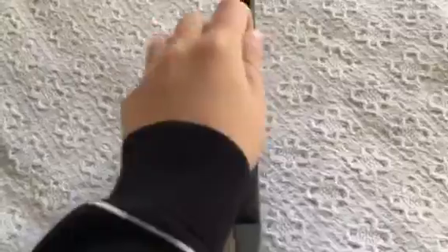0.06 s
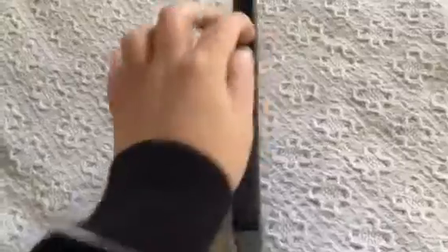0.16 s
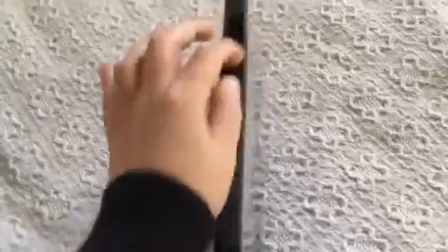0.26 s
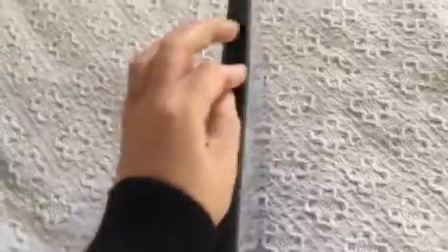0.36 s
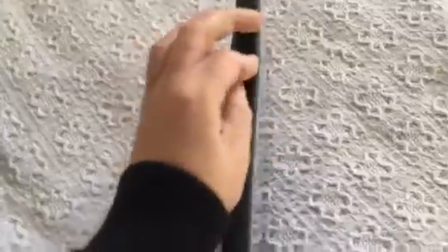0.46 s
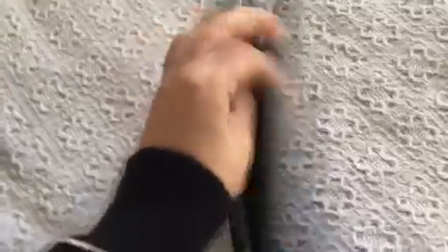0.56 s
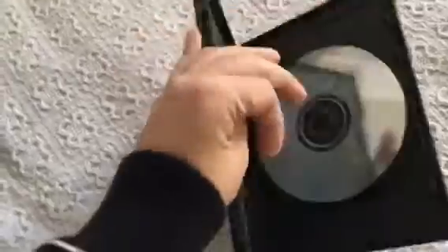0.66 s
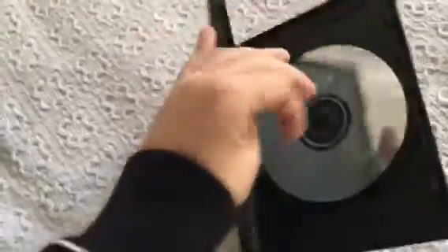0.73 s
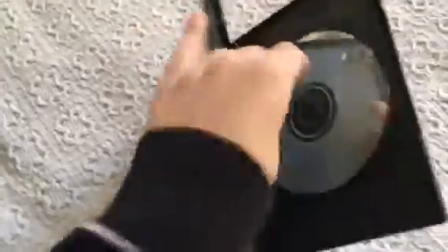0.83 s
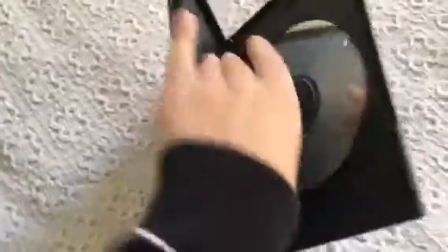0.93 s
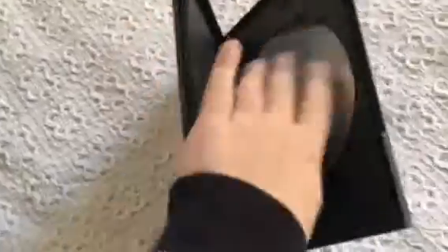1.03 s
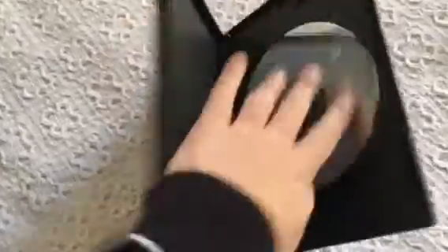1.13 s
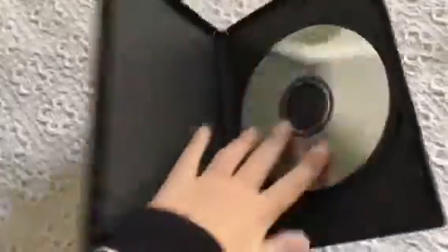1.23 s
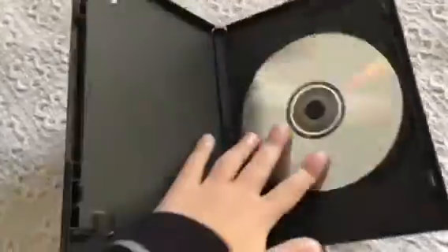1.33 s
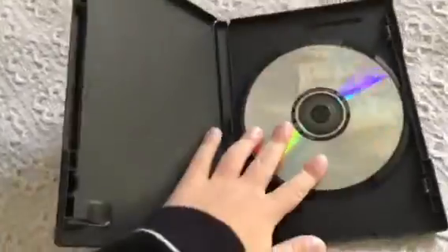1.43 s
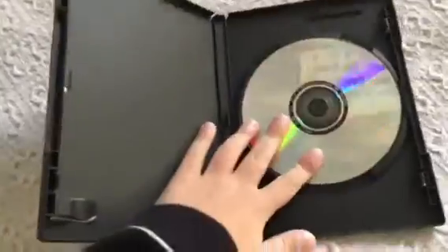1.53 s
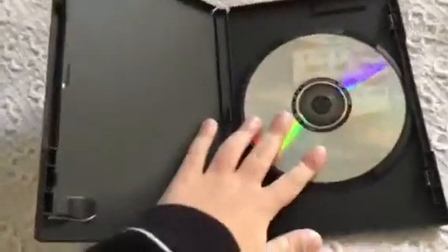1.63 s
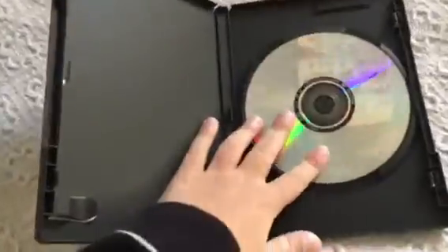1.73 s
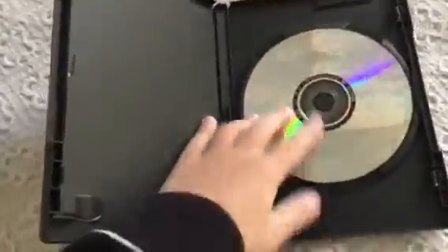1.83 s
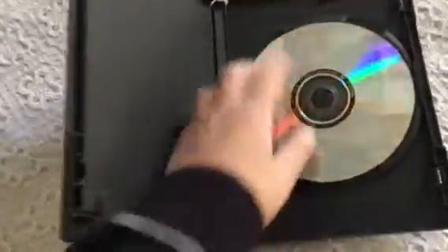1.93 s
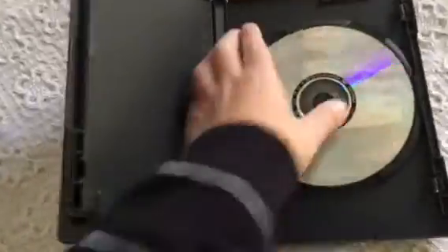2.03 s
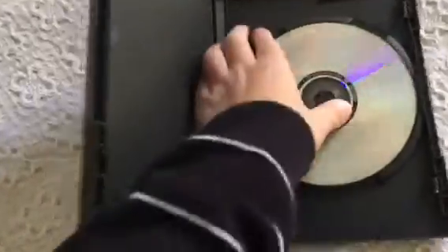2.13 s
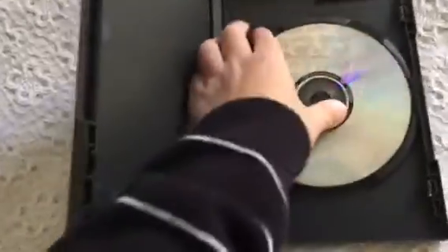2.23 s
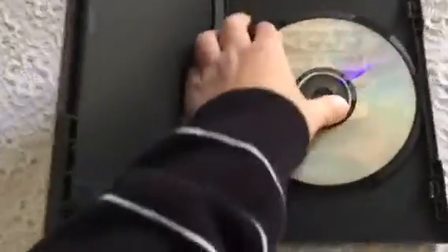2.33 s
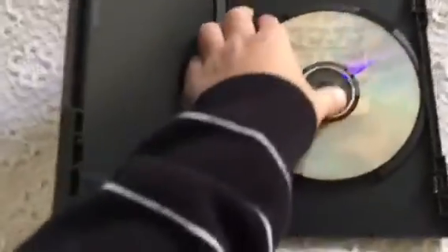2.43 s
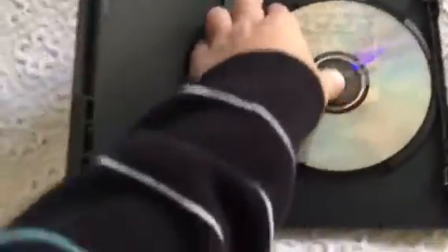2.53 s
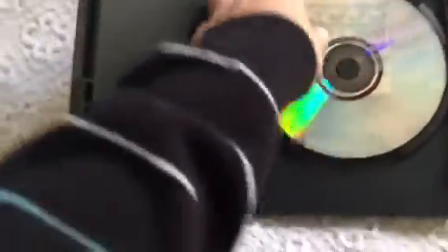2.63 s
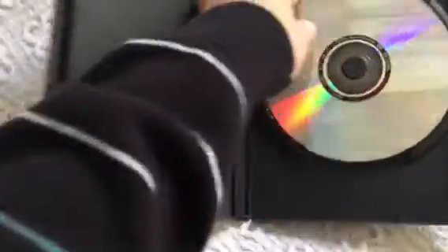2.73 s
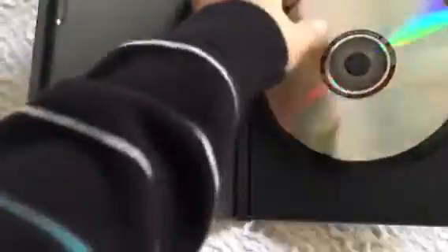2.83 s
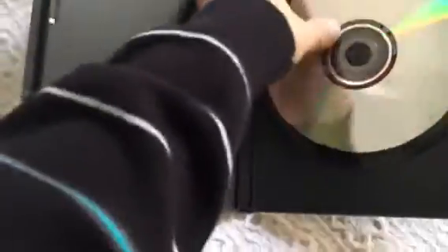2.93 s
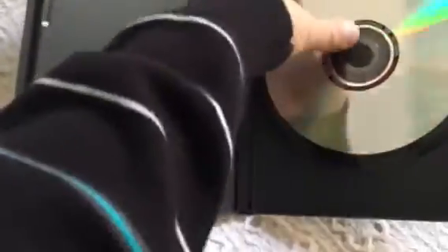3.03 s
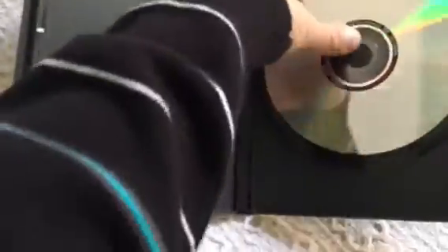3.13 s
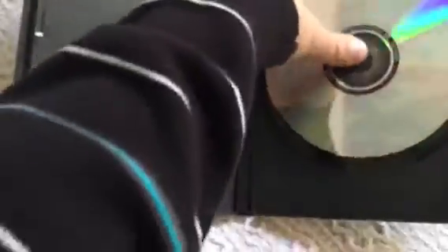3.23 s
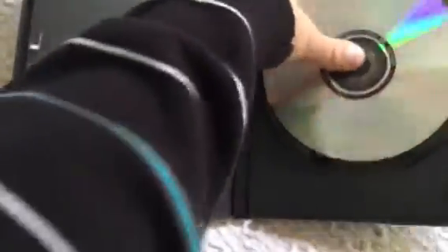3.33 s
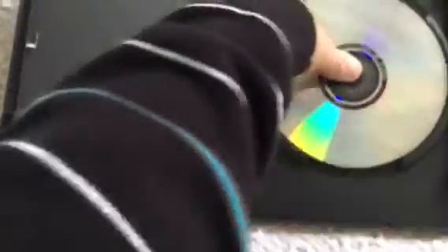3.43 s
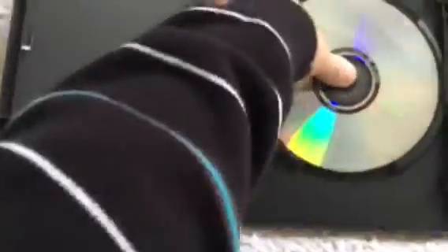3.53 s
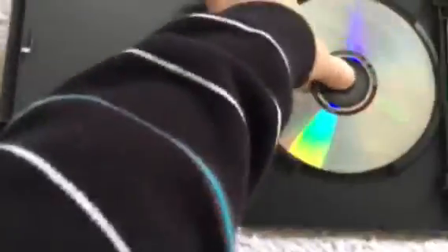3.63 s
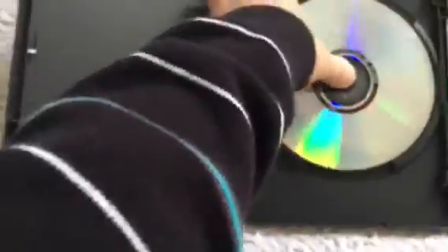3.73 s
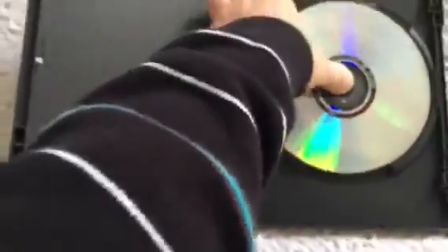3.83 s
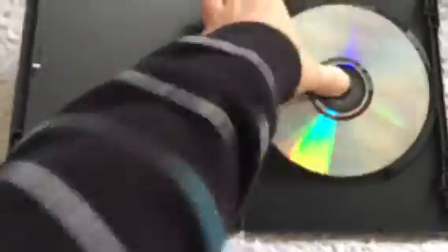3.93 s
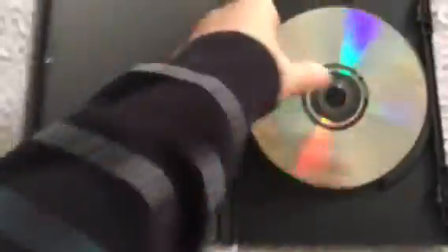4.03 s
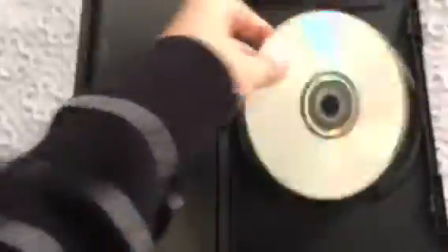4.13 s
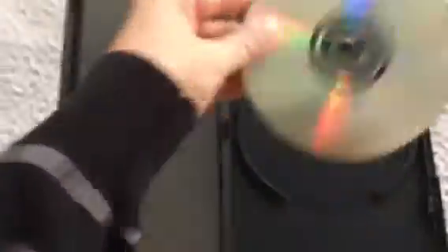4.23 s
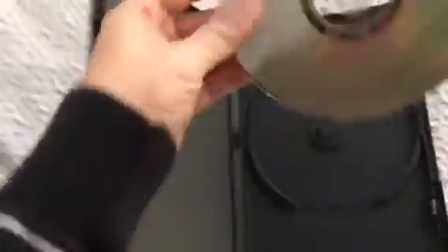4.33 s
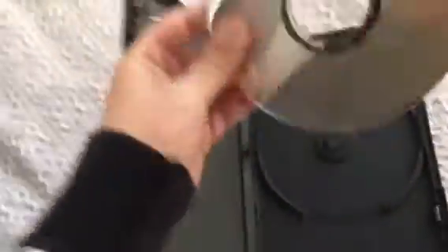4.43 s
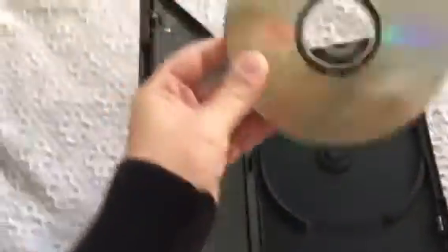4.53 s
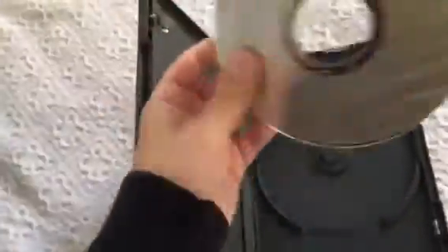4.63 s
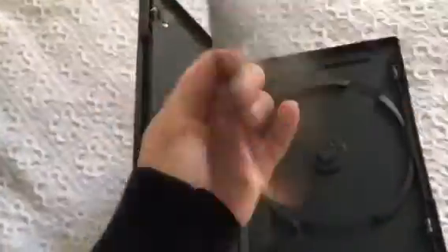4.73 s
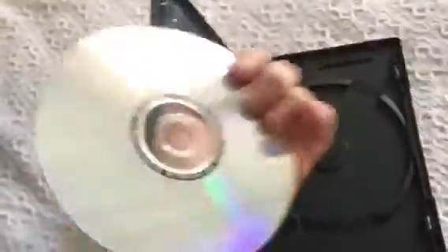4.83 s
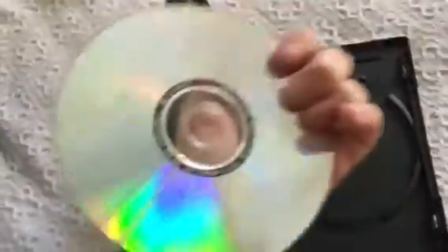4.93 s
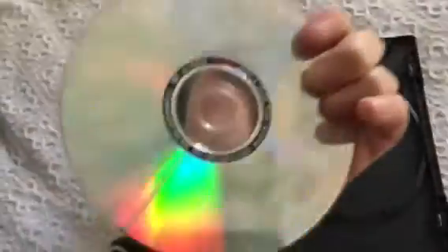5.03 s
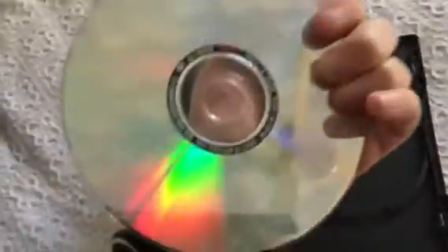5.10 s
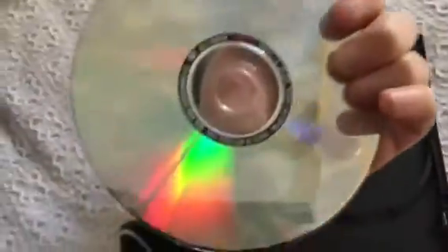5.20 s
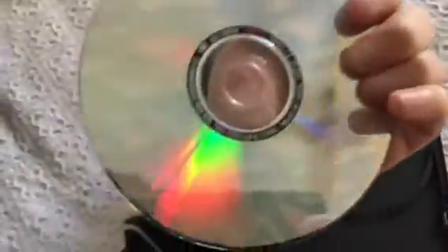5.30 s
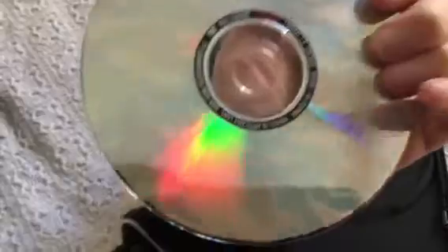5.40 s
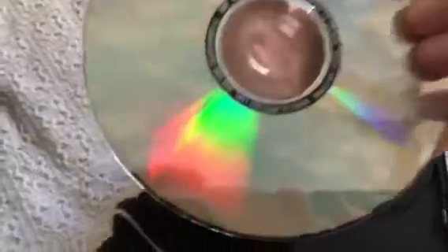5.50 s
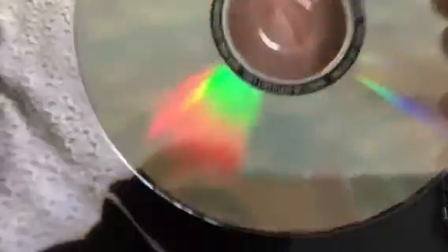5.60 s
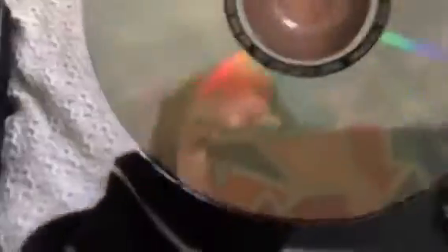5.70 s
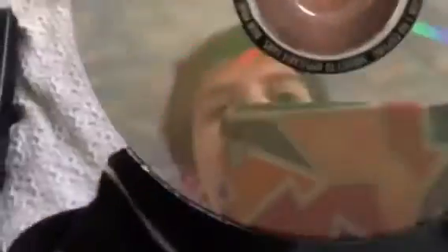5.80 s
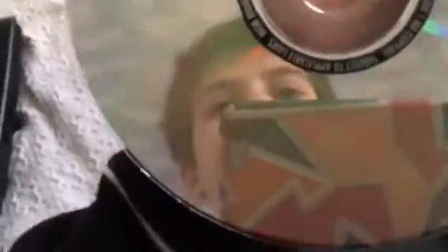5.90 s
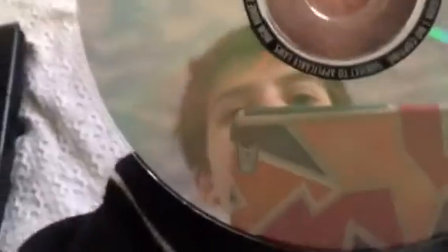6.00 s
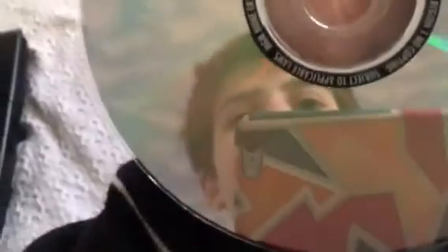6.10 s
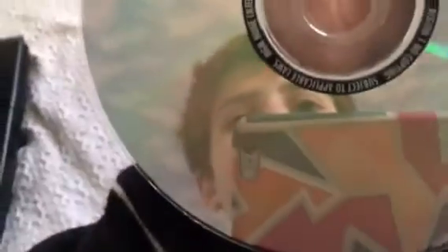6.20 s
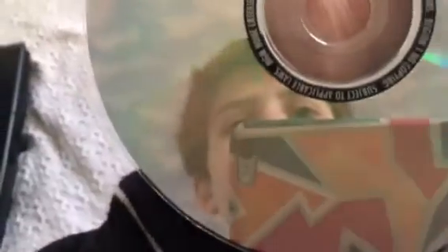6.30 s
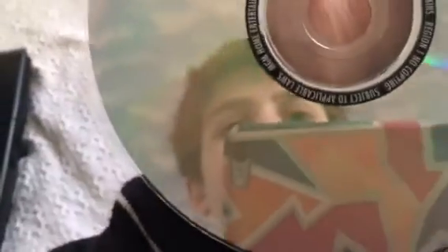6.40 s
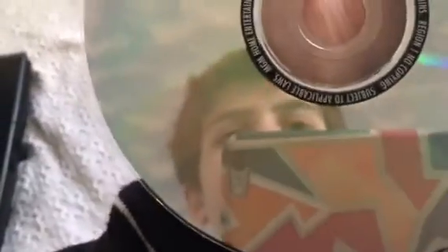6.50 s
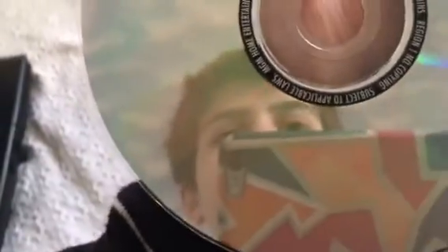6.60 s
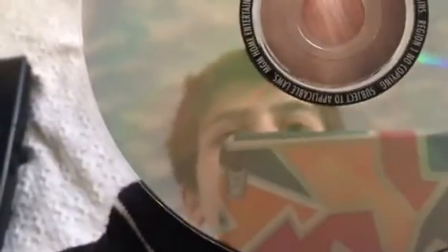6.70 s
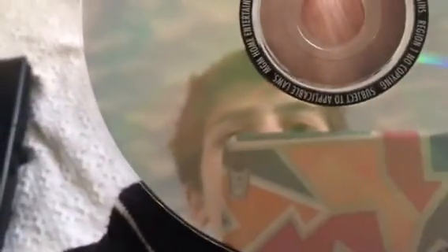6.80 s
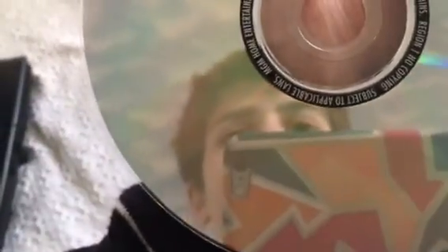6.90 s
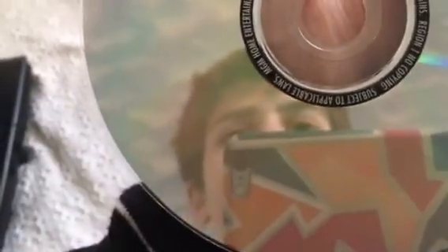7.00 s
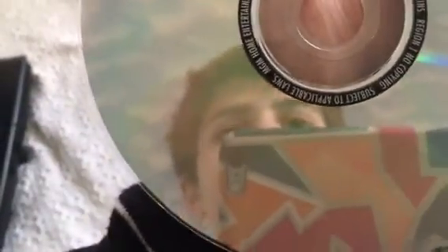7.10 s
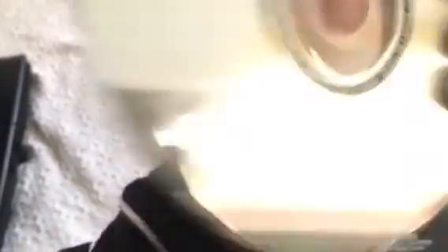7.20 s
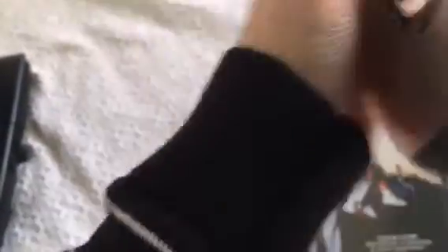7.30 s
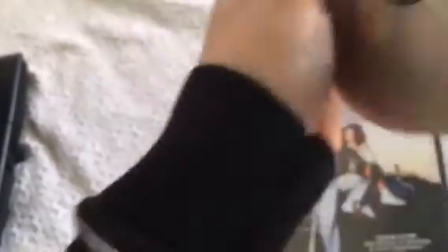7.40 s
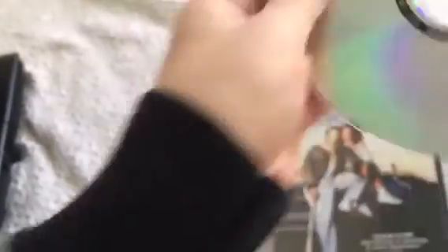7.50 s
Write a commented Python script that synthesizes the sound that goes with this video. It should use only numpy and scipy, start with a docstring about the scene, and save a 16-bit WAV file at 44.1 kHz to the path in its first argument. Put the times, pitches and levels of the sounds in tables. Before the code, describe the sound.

Close handling of a plastic disc case: faint scuffs, a hard catch snap, small hinge ticks, two sharp clicks freeing the disc, then near silence.

```python
"""In a small quiet room a plastic disc case lies on a cloth, close to the microphone.
Fingers pry at the lid until its catch snaps, fold it open and press the hub, which clicks and frees the disc.
The disc knocks on the tray, fingers scuff along its rim, and sleeve and case rub on the cloth.
Blows are decaying modes plus bursts of dense-mode noise; rubbing is stick-slip noise shaped by resonances.
Filtered noise makes the room's air and drone, and a short noise tail makes its reverberation."""
import sys
import numpy as np
from scipy import signal
from scipy.fft import rfft, irfft
from scipy.io import wavfile

SR = 44100
rng = np.random.default_rng(int(sys.argv[2]) if len(sys.argv) > 2 else 0)


def output_pcm(signal):
    """Save a mono or channel-first signal as 16-bit PCM at the path in sys.argv[1].

    Samples are clipped to [-1, 1] before scaling.
    """
    pcm = np.clip(np.atleast_2d(signal).T, -1, 1) * 32767
    wavfile.write(sys.argv[1], SR, np.round(pcm).astype(np.int16))


N = 332955
TIME = np.arange(N) / SR   # s
RING_TIME = TIME[:SR // 3]
CRACK_TIME = TIME[:SR // 20]


def from_db(db):
    """Level law: decibels to amplitude gain."""
    return 10 ** (np.asarray(db) / 20)


def rms_one(x):
    """Normalisation: scale to unit rms."""
    return x / np.sqrt(np.mean(x ** 2) + 1e-20)


def at_hz(points, hz):
    """Interpolation on a log-frequency axis: read a table of (Hz, value)."""
    f, value = np.transpose(points)
    return np.interp(np.log(hz), np.log(f), value)


def band(x, hz, kind, order=2):
    """Linear filtering: a causal Butterworth filter."""
    return signal.sosfilt(signal.butter(order, hz, kind, fs=SR, output="sos"), x + 1e-18)


def coloured(x, colour):
    """Spectral shaping: weight a steady excitation by frequency; rms 1."""
    hz = np.maximum(np.arange(N // 2 + 1) * SR / N, 1)
    return rms_one(irfft(rfft(x) * from_db(at_hz(colour, hz)), N))


def add(out, s, sound):
    """Superposition: mix a sound in at time s."""
    start = int(np.clip(round(s * SR), 0, N - 1))
    out[start:start + len(sound)] += sound[:N - start]


# third-octave filter bank
EDGES = np.geomspace(22, 17500, 30)   # Hz
CENTRES = np.sqrt(EDGES[1:] * EDGES[:-1])   # Hz
BANK = [signal.butter(2, EDGES[k:k + 2], "band", fs=SR, output="sos") for k in range(len(CENTRES))]


def dying_noise(time, colour, t60s, build_s):
    """High modal density: each third-octave band swells, then decays at its own rate; unit energy."""
    white = rng.standard_normal((2, len(time)))
    bands = np.array([signal.sosfilt(sos, white[k % 2]) for k, sos in enumerate(BANK)])
    decay = np.exp(-np.log(1000) * time / t60s[:, None])
    bands = bands * decay * (1 - np.exp(-time / build_s))
    gains = np.sqrt(CENTRES / np.sum(bands ** 2, axis=1)) * from_db(at_hz(colour, CENTRES))
    out = gains @ bands
    return out / np.sqrt(np.sum(out ** 2))


def friction(grains_per_s, spread_db, smooth):
    """Stick-slip: tiny slips of uneven size over a smooth hiss."""
    sizes = from_db(spread_db * np.minimum(rng.exponential(1, N), 4)) * rng.choice([-1, 1], N)
    slips = sizes * (rng.random(N) < grains_per_s / SR)
    return rms_one(slips) + smooth * rng.standard_normal(N)


def unevenness(per_s, spread_db):
    """Irregular friction: a sliding hand catches and lets go, a wandering gain."""
    knots = np.arange(0, TIME[-1] + 1, 1 / per_s)
    return from_db(spread_db * np.interp(TIME, knots, rng.standard_normal(len(knots))))


def strokes(grit, rows):
    """Amplitude modulation: brief gritty slides swell and fade along a Gaussian."""
    low = band(grit, 2300, "low")
    top = -band(grit, 4100, "high")   # sign aligns the phase of the two bands
    out = np.zeros(N)
    for s, half, db, treble_db in rows:
        near = abs(TIME - s) < 4 * half
        swell = np.exp(-((TIME[near] - s) / half) ** 2 / 2)
        out[near] += from_db(db) * swell * (low[near] + from_db(treble_db) * top[near])
    return out


def struck(blows, modes, crack, crack_db, crack_t60, bass_hz=750, treble_hz=3000):
    """Impact excitation: each blow rings the modes and a fresh crack; bass and treble levels vary by blow."""
    ring = sum((-1) ** k * from_db(db - 60 * RING_TIME / t60) * np.sin(2 * np.pi * hz * RING_TIME)
               for k, (hz, db, t60) in enumerate(modes))
    t60s = crack_t60 * (CENTRES / 2000) ** -.35   # plastic damps the treble first
    low, middle, top = np.zeros((3, N))
    for s, db, bass_db, treble_db in blows:
        hit = ring.copy()
        add(hit, 0, from_db(crack_db) * dying_noise(CRACK_TIME, crack, t60s, build_s=.0001))
        add(low, s, from_db(db + bass_db) * hit)
        add(middle, s, from_db(db) * hit)
        add(top, s, from_db(db + treble_db) * hit)
    # minus signs align the phase of the bands at each crossover
    upper = band(middle, treble_hz, "low") - band(top, treble_hz, "high")
    return band(low, bass_hz, "low") - band(upper, bass_hz, "high")


# spectrum of the quiet room's air: frequency_hz, relative_density_db (dB per Hz)
AIR_SPECTRUM = [(22, -24), (42, -6), (60, -1.5), (90, -14), (200, -17.5), (330, -25.5), (560, -29),
                (1100, -36.5), (3500, -43.5), (16000, -50.5)]
# low drone of the house: centre_hz, width_hz, level_db
DRONE_BANDS = [(56, 12, -68.5), (113, 18, -72.5)]
AIR_LEVEL_DB = -62


def air():
    """Narrow-band noise beats with itself: steady room noise under a low wavering drone."""
    drone = np.zeros(N)
    for hz, width, db in DRONE_BANDS:
        hum = band(rng.standard_normal(N + SR), [hz - width / 2, hz + width / 2], "band")
        drone += from_db(db) * rms_one(hum[SR:])   # skip the filter's build-up
    return from_db(AIR_LEVEL_DB) * coloured(rng.standard_normal(N), AIR_SPECTRUM) + drone


# strokes of hand and sleeve over case and cloth: start_s, length_s, drag_db, fibre_hiss_db, hollow_pitch_hz
CLOTH_STROKES = [(0.0, 0.61, -71.5, -75, 800), (0.22, 0.09, -63, -76, 815), (0.85, 0.2, -65, -65, 1250),
                 (0.98, 0.105, -60, -68, 1620), (1.003, 0.24, -67, -65.5, 1190),
                 (1.181, 0.23, -62, -60, 1070), (1.293, 0.3, -70.5, -61.5, 1290),
                 (1.494, 0.22, -74, -74.5, 1260), (1.992, 0.31, -63.5, -65, 1240),
                 (2.203, 0.52, -75.5, -79.5, 1200), (2.643, 0.27, -69, -71.5, 1300),
                 (2.832, 0.44, -70.5, -92, 680), (3.065, 0.16, -71, -86, 1240),
                 (3.24, 0.18, -65, -77, 1400), (3.406, 0.28, -66, -74, 1550), (3.5, 0.88, -70, -67.5, 1102),
                 (4.166, 0.16, -68, -77.5, 1080), (4.206, 0.51, -74, -79, 644),
                 (5.5, 0.73, -75.5, -79.5, 1420)]
# spectrum of the dull drag: frequency_hz, relative_density_db (dB per Hz)
DRAG_SPECTRUM = [(200, -20), (550, -3), (900, -2.5), (1600, 1.5), (2400, -7), (4000, -16.5), (8000, -33)]
# spectrum of the hissing fibres: frequency_hz, relative_density_db (dB per Hz)
FIBRE_SPECTRUM = [(1200, -25.5), (2500, -1), (4000, -0.5), (6300, -3), (8000, -5.5), (9500, -3.5),
                  (10500, -10), (15000, -9.5)]
HOLLOW_RISE_OCTAVES, HOLLOW_WIDTH_OCTAVES, HOLLOW_GAIN = .3, 0.8, .7
SLEEVE_REST_DB = -85.5   # the sleeve is never quite still
SPEED_UP_SHARE, SLOW_DOWN_SHARE = .35, .3   # of each stroke's length


def cloth():
    """Sliding friction: a stroke's speed sets the level of drag and hiss and lifts a hollow resonance."""
    rub, *grit = [friction(grains_per_s=540, spread_db=3.5, smooth=.8) for _ in range(3)]
    rub = coloured(rub, DRAG_SPECTRUM)
    fibres = coloured(friction(grains_per_s=1500, spread_db=3.0, smooth=1.1), FIBRE_SPECTRUM)
    fibres = fibres * unevenness(per_s=40, spread_db=1.8)
    catching = unevenness(per_s=45, spread_db=3.4)
    pitches = CENTRES[(CENTRES > 400) & (CENTRES < 2800)]
    hollows = np.array([rms_one(band(grit[k % 2], [hz / 1.12, hz * 1.12], "band"))
                        for k, hz in enumerate(pitches)])
    hollows = hollows * [unevenness(per_s=29, spread_db=3.5) for _ in pitches]
    out = from_db(SLEEVE_REST_DB) * fibres
    for start, length, drag_db, hiss_db, hollow_hz in CLOTH_STROKES:
        during = (TIME >= start) & (TIME < start + length)
        progress = (TIME[during] - start) / length
        speed = np.clip(np.minimum(progress / SPEED_UP_SHARE, (1 - progress) / SLOW_DOWN_SHARE), 0, 1)
        # the resonance reaches its listed pitch at full speed
        octaves_off = np.log2(pitches / hollow_hz)[:, None] + HOLLOW_RISE_OCTAVES * (1 - speed)
        weights = np.exp(-(octaves_off / HOLLOW_WIDTH_OCTAVES) ** 2)
        hollow = np.sum(hollows[:, during] * weights, axis=0)
        drag = rms_one(rub[during] + HOLLOW_GAIN * hollow) * catching[during]
        out[during] += speed * (from_db(drag_db) * drag + from_db(hiss_db) * fibres[during])
    return out


# short slides of the shell on the cloth: centre_s, half_length_s, level_db, treble_db (relative)
CASE_SCUFFS = [(0.018, 0.011, -52.5, -15), (0.293, 0.0014, -48, -3.5), (0.669, 0.004, -62, -10),
               (1.129, 0.011, -63, 4.5), (1.25, 0.02, -48.5, -10), (1.271, 0.0097, -46.5, 3.5),
               (1.321, 0.0087, -48, -1.5), (2.832, 0.014, -56.5, -24), (3.343, 0.016, -63, 2.5)]
# spectrum of the rasp: frequency_hz, relative_density_db (dB per Hz)
SCUFF_SPECTRUM = [(180, -40), (300, -1), (447, -9), (511, -31.5), (603, -5.5), (1300, -8.5), (1690, -9.5),
                  (3030, -9), (5610, -13.5), (6520, -7), (16000, -27)]


def case_scuffs():
    """Broadband friction: the shell scuffs the cloth with a broad rasp."""
    rasp = coloured(friction(grains_per_s=580, spread_db=3.5, smooth=1.0), SCUFF_SPECTRUM)
    return strokes(rasp, CASE_SCUFFS)


HINGE_START_S, HINGE_LENGTH_S, HINGE_TICKS_PER_S = .8, .5, 30
HINGE_START_DB, HINGE_FADE_DB_PER_S, HINGE_SPREAD_DB = -46, 18, 3.0


def hinge(bass_db, treble_db):
    """Intermittent slip: the bending spine ticks unevenly, weaker as it relaxes; returns rows of blows."""
    draws = rng.standard_normal((40, 2))
    times = np.cumsum(np.exp(.5 * draws[:, 0]) / HINGE_TICKS_PER_S)
    levels = HINGE_START_DB - HINGE_FADE_DB_PER_S * times + HINGE_SPREAD_DB * draws[:, 1]
    return [(HINGE_START_S + t, db, bass_db, treble_db)
            for t, db in zip(times, levels) if t < HINGE_LENGTH_S]


# prying, the catch snapping open, the hinge ticking, the lid landing:
# start_s, level_db, bass_db, treble_db (both relative to the level)
CASE_IMPACTS = [(0.0688, -29.5, -6, -4.5), (0.4570, -39, -18, 5), (0.4762, -40.5, -15, 3),
                (0.5218, -30.5, 2.5, 9), (0.6841, -4, -4, -3.5), (0.6870, -3, -1, -3),
                (0.6922, -23.5, -28.5, 17), (0.6936, -6, -28.5, -13), (0.7478, -19, -36, -7),
                (0.7540, -33, -10, 2), (0.8580, -38, -26, 3), (1.5470, -36, -30, -1)]
# ringing modes of the shell: frequency_hz, level_db, t60_s
CASE_RINGING = [(112.1, -17, 0.12), (210.5, -19, 0.07), (315, -16.5, 0.051), (613, -12, 0.022),
                (762, -14.5, .016), (1080, -37, 0.14), (1440, -24.5, 0.011), (1700, -26.5, 0.016),
                (1955, -21.5, 0.02), (2322, -41, 0.1), (3201, -21.5, 0.015), (4150, -21.5, 0.015),
                (5700, -27.5, 0.016)]
# crack of the shell's close, damped plate modes: frequency_hz, relative_density_db (dB per Hz)
CASE_CRACK_SPECTRUM = [(150, -0.5), (350, -2), (490, -7), (650, 0), (800, 0), (1050, -4), (1500, 0.5),
                       (2500, -5.5), (4200, -6), (7000, -5), (10000, -11), (15000, -21)]


def case_shell():
    """Plate vibration: blows and hinge ticks excite the modes of the plastic shell."""
    blows = CASE_IMPACTS + hinge(bass_db=-18, treble_db=-1)
    return struck(blows, CASE_RINGING, CASE_CRACK_SPECTRUM, crack_db=4.0, crack_t60=0.02)


# soft fingertip taps and presses, each on a spot with its own pitch: start_s, level_db, pitch_hz
FINGER_TAPS = [(0.997, -50.5, 483), (1.881, -53, 266), (2.141, -53, 280), (2.271, -56, 284),
               (2.765, -49.5, 287), (2.921, -38.5, 1610), (2.9256, -41, 1074), (3.679, -50, 197.3),
               (4.0546, -42, 247), (4.0815, -46, 1820), (4.1380, -29, 1170), (4.1400, -31, 720),
               (4.1855, -39, 820)]
TAP_ATTACK_S = 0.00049   # the finger pad softens the contact
TAP_CYCLES = 17   # cycles to decay by 60 dB


def taps():
    """Damped flexure: a padded blow bends the panel for a few cycles, with a faint rasp of skin."""
    out = np.zeros(N)
    attack = 1 - np.exp(-RING_TIME / TAP_ATTACK_S)
    for s, db, hz in FINGER_TAPS:
        rasp = rms_one(band(rng.standard_normal(len(RING_TIME)), [hz / 2, hz * 2], "band"))
        decay = from_db(db - 60 * RING_TIME * hz / TAP_CYCLES)
        add(out, s, decay * attack * (np.sin(2 * np.pi * hz * RING_TIME) + .4 * rasp))
    return out


# fingers skidding on the rim of the disc: centre_s, half_length_s, level_db, treble_db (relative)
RIM_SKIDS = [(1.928, 0.048, -66.5, -9), (4.829, 0.015, -61.5, 3.5), (4.9, 0.02, -62.5, 4.5),
             (4.921, 0.0038, -52.5, 2), (7.315, 0.002, -64, 0), (7.32, 0.0018, -51.5, 0.5),
             (7.346, 0.028, -52.5, -2), (7.354, 0.0023, -44.5, 3), (7.499, 0.024, -62, 0.5),
             (7.544, 0.0031, -36, -3)]
# resonances of the held disc: frequency_hz, width_hz, relative_level_db
HELD_DISC_RESONANCES = [(238.9, 100, -1.5), (452.6, 330, -3), (977, 130, 3.5), (2050, 350, -3.5),
                        (2580, 500, -3), (3170, 340, -1), (3650, 510, -1), (4370, 250, 2.5),
                        (5200, 390, -0.5), (6200, 1340, -3.5), (9230, 580, -8), (12000, 5200, -17)]


def rim_skids():
    """Friction-driven resonance: skin slipping on the disc sets its resonances going."""
    slips = friction(grains_per_s=2300, spread_db=5.0, smooth=1.0)
    rim = sum((-1) ** k * from_db(db) * signal.lfilter(*signal.iirpeak(hz, hz / width, fs=SR), slips)
              for k, (hz, width, db) in enumerate(HELD_DISC_RESONANCES))
    return strokes(rms_one(rim), RIM_SKIDS)


# the springy hub under the thumb: start_s, level_db, bass_db, treble_db (both relative to the level)
HUB_IMPACTS = [(2.8320, -34, 2, -27), (3.1653, -42, -4, -17), (3.5341, -8.5, 7.5, 3.5),
               (3.5475, -28, 1.5, 2.5), (3.5571, -13, -0.5, -15), (3.6218, -25, 6.5, -5.5)]
# ringing modes of the hub: frequency_hz, level_db, t60_s
HUB_RINGING = [(522, -26.5, 0.028), (1235, -22, 0.02), (1562, -12.5, 0.013), (2000, -17.5, 0.022),
               (3087, -14, 0.012), (3150, -37, 0.26), (5700, -9.5, 0.01), (6765, -19, .008)]
# crack of the hub's close, damped modes: frequency_hz, relative_density_db (dB per Hz)
HUB_CRACK_SPECTRUM = [(150, -9), (500, -8.5), (950, -8), (1500, 3), (2300, -10.5), (3200, 0.5),
                      (4400, -10.5), (5800, -3), (9000, -8.5), (15000, -12)]


def hub():
    """Snap release: clicks of the springy hub excite its short, damped modes."""
    return struck(HUB_IMPACTS, HUB_RINGING, HUB_CRACK_SPECTRUM, crack_db=6.0, crack_t60=0.016)


# the disc springing free, touching the tray and shifting in the fingers:
# start_s, level_db, bass_db, treble_db (both relative to the level)
DISC_IMPACTS = [(3.8554, 0, 0.5, -3), (3.8583, -12.5, 2, 6.5), (3.8690, -24, -4, 6),
                (4.0528, -34.5, 7, -23), (4.1300, -48.5, 24.5, 12), (4.1378, -39, 20, -12),
                (4.2633, -33, 5, -2), (4.7771, -54, -11.5, 6), (4.9125, -44, 18.5, -2),
                (5.5329, -57, -4.5, 12.5), (7.2190, -57.5, -10, 1), (7.3518, -45, 6, -2),
                (7.5040, -49, 7, -1), (7.5200, -49.5, -12, 8)]
# ringing modes of the disc: frequency_hz, level_db, t60_s
DISC_RINGING = [(117, -30, .12), (227, -29, .05), (385.1, -23, 0.021), (632.2, -30.5, 0.013),
                (1130, -25, 0.027), (1440, -12.5, 0.01), (1850, -13, 0.016), (2316, -24.5, .05),
                (3010, -34.5, .06), (3380, -36, .06), (4730, -39.5, .08), (5627, -20.5, .03),
                (6290, -26.5, 0.029), (7000, -22.5, 0.013), (7150, -17.5, 0.013), (7900, -22, 0.012)]
# crack of the disc's close, damped plate modes: frequency_hz, relative_density_db (dB per Hz)
DISC_CRACK_SPECTRUM = [(150, -4), (450, -9), (950, -13), (1350, 1), (2200, 1), (3000, -4.5), (4300, -13),
                       (5800, -2.5), (7200, -.5), (9300, -13.5), (11500, -9), (15000, -11.5)]


def disc():
    """Plate vibration: knocks excite the many modes of the thin disc."""
    return struck(DISC_IMPACTS, DISC_RINGING, DISC_CRACK_SPECTRUM, crack_db=7, crack_t60=0.022)


# slowly dying modes of the disc off the tray: frequency_hz, level_db, t60_s
FREE_DISC_RINGING = [(528, -68, 1.7), (1070, -67, 1.0)]
LIFT_S = 4.264


def free_disc():
    """Light damping: held only by its rim, the disc hums faintly after its last touch on the tray."""
    out = np.zeros(N)
    hum = sum(from_db(db - 60 * TIME / t60) * np.sin(2 * np.pi * hz * TIME)
              for hz, db, t60 in FREE_DISC_RINGING)
    add(out, LIFT_S, hum)
    return out


# reverberation time of the room: frequency_hz, t60_s
ROOM_DECAY = [(100, 0.15), (500, 0.19), (2000, 0.18), (6000, 0.23), (15000, .22)]
# spectrum of the reflections: frequency_hz, relative_level_db
ROOM_SPECTRUM = [(100, 0), (400, -1.5), (1000, -2), (1700, -1.5), (2600, 1.5), (4500, -0.5), (6500, -4.5),
                 (10000, -5), (15000, -9.5)]


def room(x, wet_db, first_echo_s):
    """Reverberation: reflections follow the direct sound and die quickly among soft furnishings."""
    tail = dying_noise(RING_TIME, ROOM_SPECTRUM, at_hz(ROOM_DECAY, CENTRES), build_s=.003)
    out = np.zeros(N)
    add(out, first_echo_s, from_db(wet_db) * signal.oaconvolve(x, tail)[:N])
    return out


def scene():
    """Superposition: three plastic parts, fingers and cloth, heard in the room."""
    case_sound = case_shell()
    hub_sound = hub()
    disc_sound = disc() + free_disc()
    fingers = case_scuffs() + rim_skids() + taps()
    # the thumb covers the hub, so less of it reaches the walls
    to_walls = from_db(2.5) * case_sound + from_db(-4.5) * hub_sound + disc_sound + fingers
    echoes = room(to_walls, wet_db=-17.0, first_echo_s=.006)
    return (case_sound + hub_sound + disc_sound + fingers + echoes + cloth() + air())[None]


CUTOFF_HZ = 15800


def record(dry):
    """Band limiting: the microphone loses the deepest bass; the top is cut."""
    top_cut = signal.ellip(10, .1, 80, CUTOFF_HZ, fs=SR, output="sos")
    return signal.sosfilt(top_cut, band(dry, 35, "high"))


dry = scene()
out = record(dry)
output_pcm(out)
```